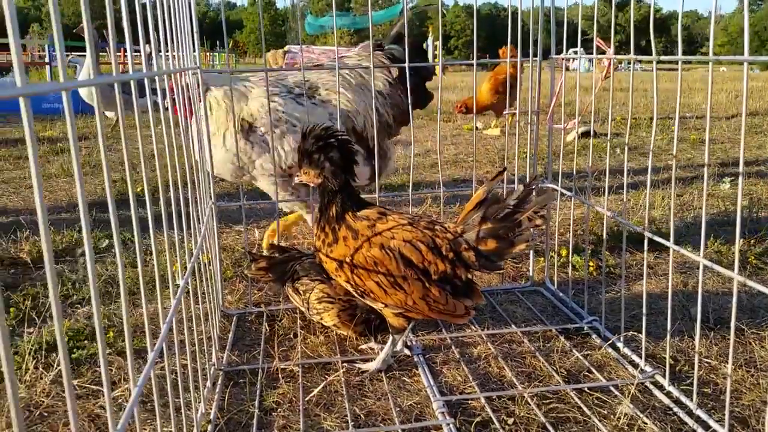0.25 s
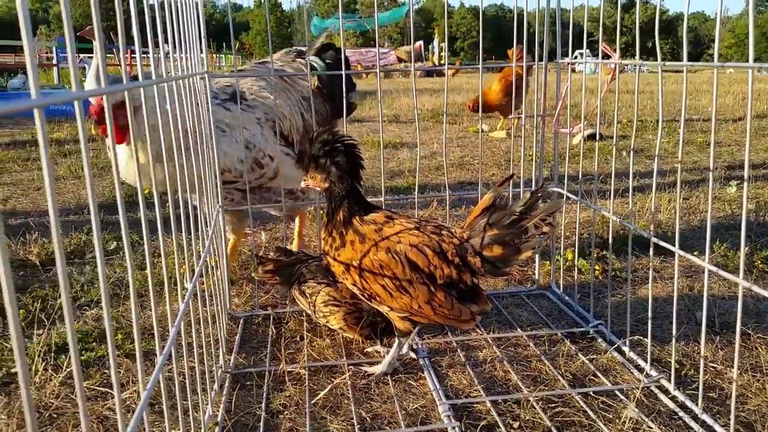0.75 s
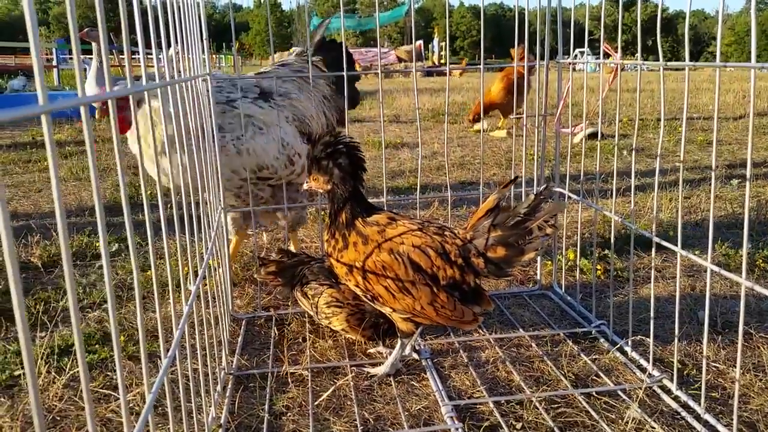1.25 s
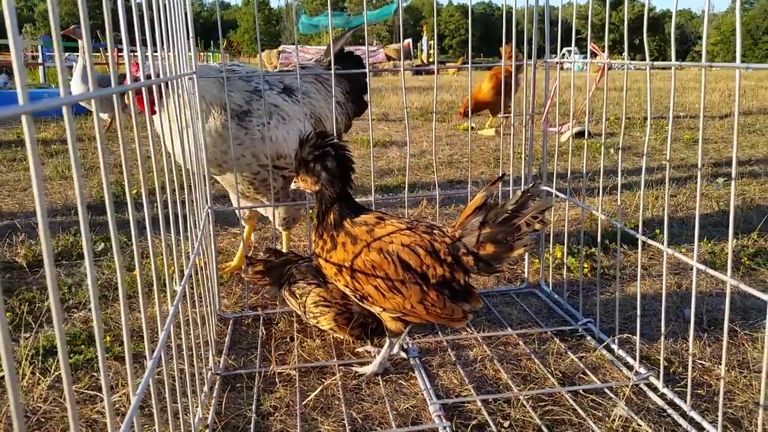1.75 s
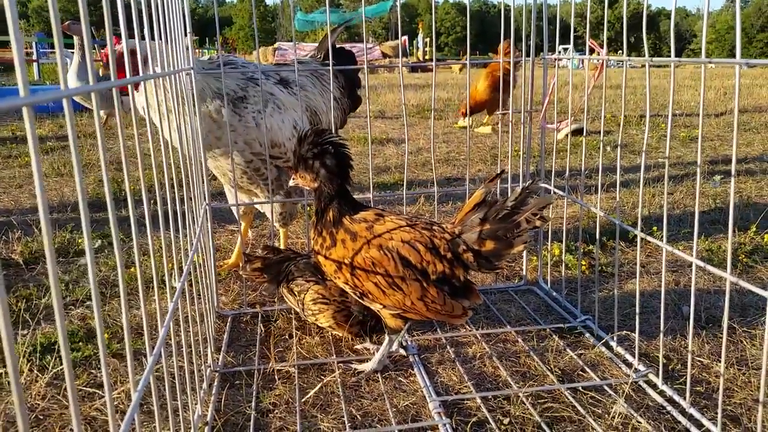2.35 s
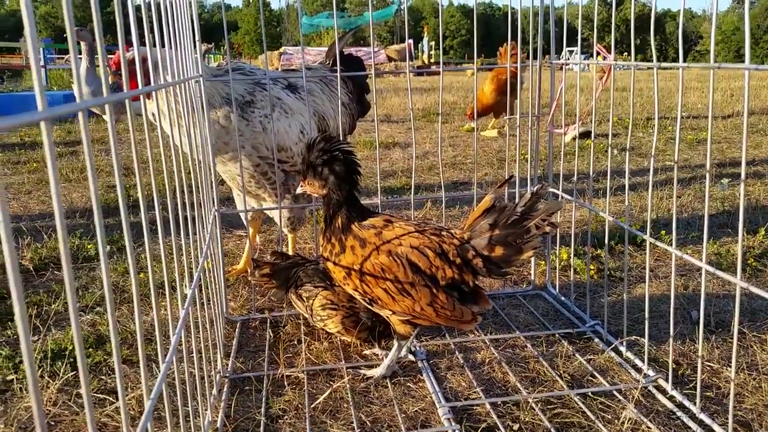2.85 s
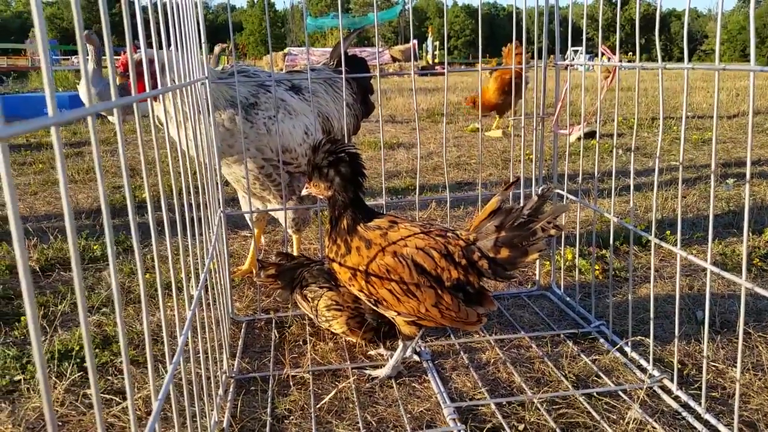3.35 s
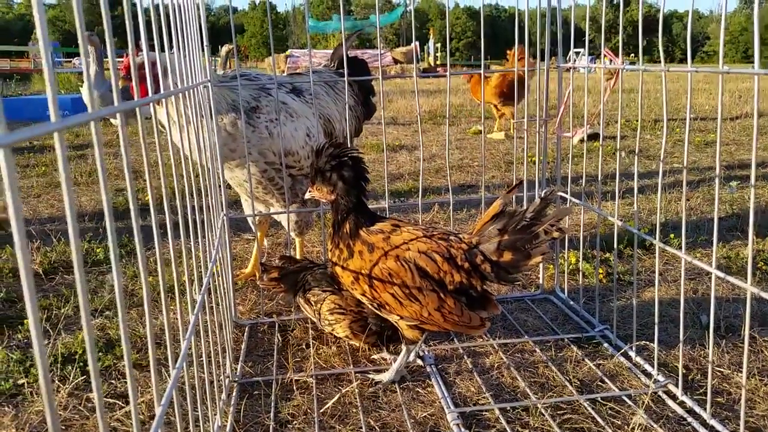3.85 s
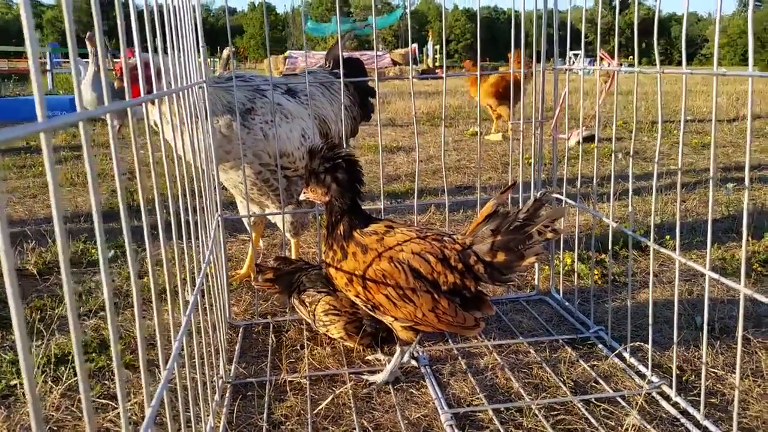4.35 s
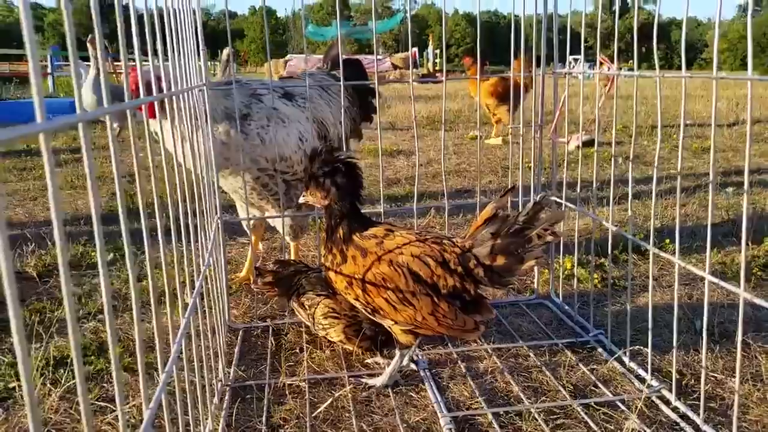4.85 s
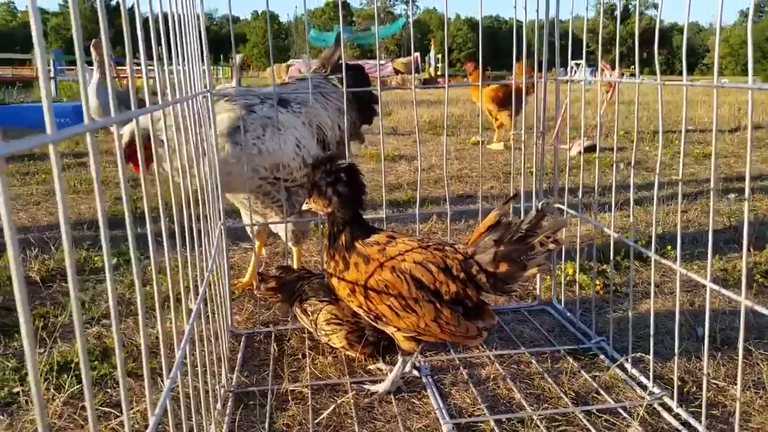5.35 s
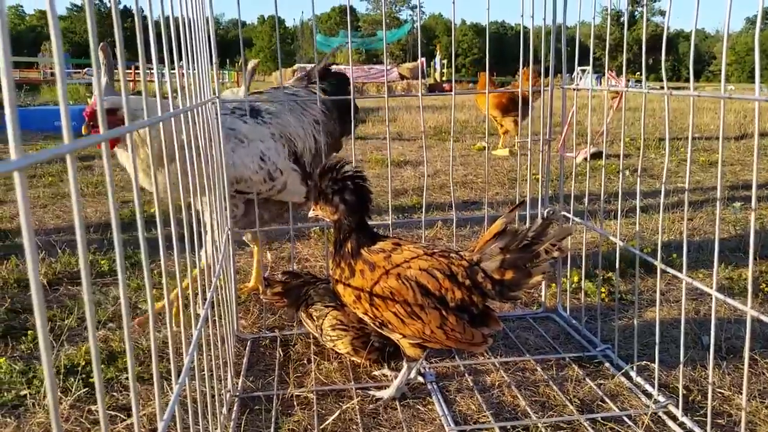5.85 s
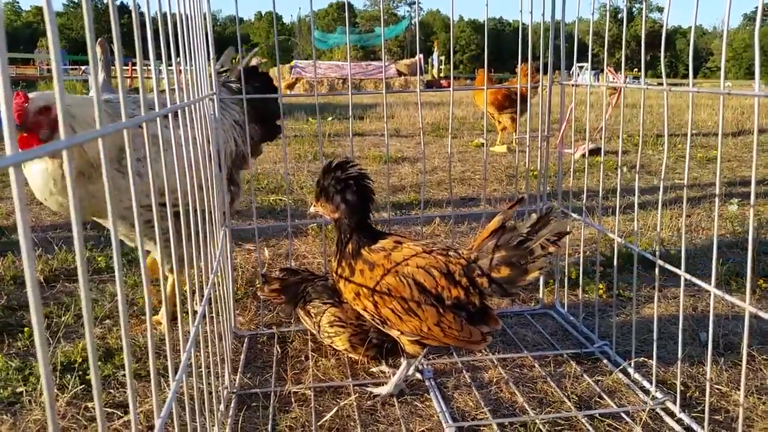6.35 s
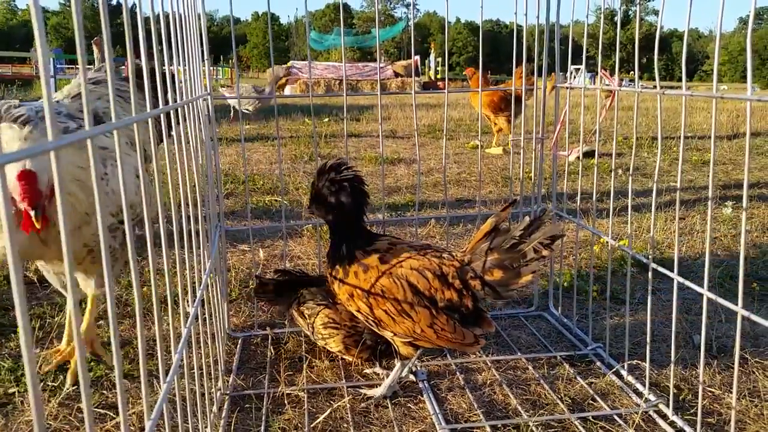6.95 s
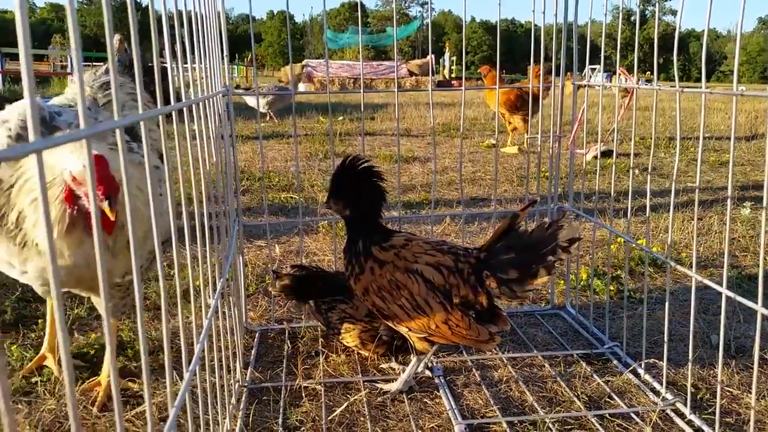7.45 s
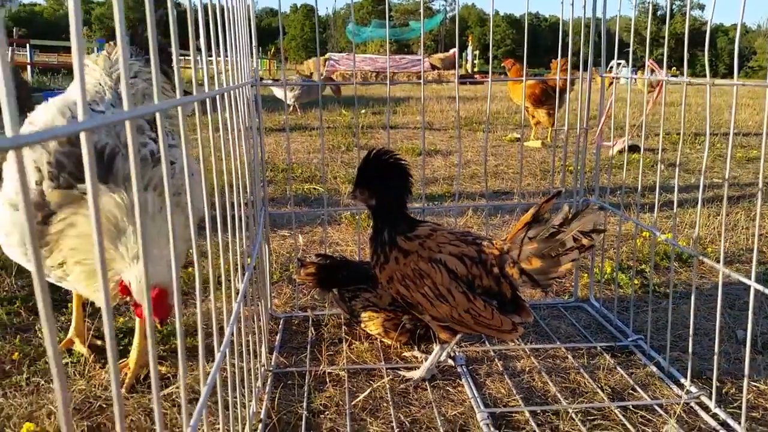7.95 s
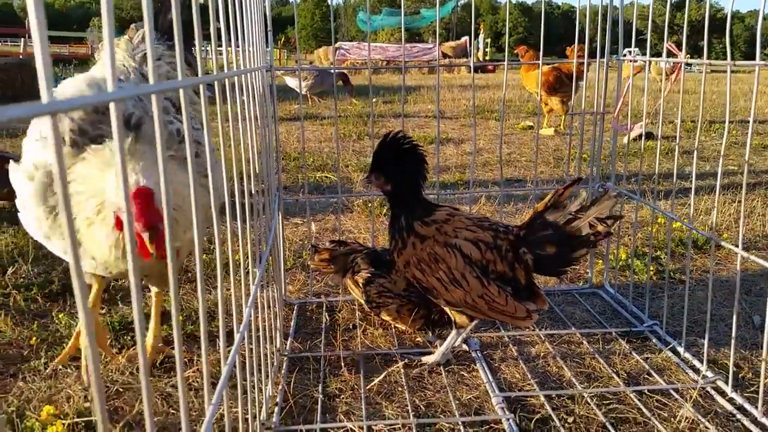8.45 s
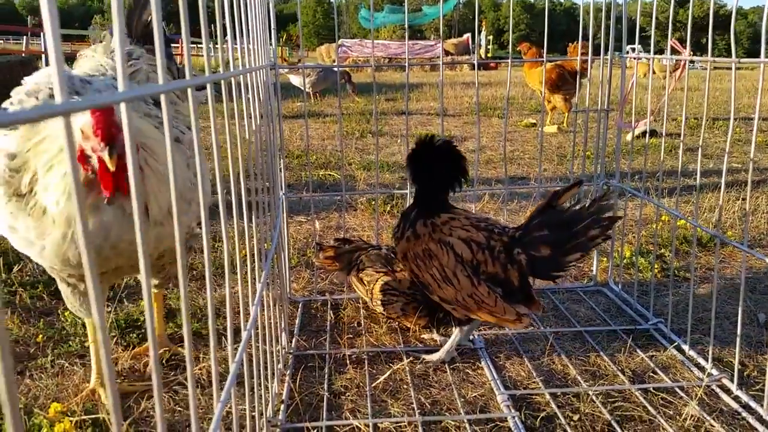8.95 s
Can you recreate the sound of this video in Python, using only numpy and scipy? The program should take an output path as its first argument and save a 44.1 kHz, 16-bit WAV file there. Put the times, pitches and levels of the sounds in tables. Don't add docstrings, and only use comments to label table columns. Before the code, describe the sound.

Calm open farmland with almost no echo: crickets trill thinly, a katydid rasps faintly and a distant aircraft hums lower and lower. Two rooster clucks come early, then soft, rapid hen clucks in bursts. After a single bump on the handheld phone, rooster clucks resume with small bird peeps, dry rustles, bursting wind pops and tiny stalk snaps, ending with a loud open cluck.

```python
import sys
import numpy as np
from scipy import signal
from scipy.io import wavfile
from scipy.ndimage import uniform_filter1d

SR = 44100
rng = np.random.default_rng(int(sys.argv[2]) if len(sys.argv) > 2 else 0)


def magnitude_from_level(level_db):
    exponent = np.asarray(level_db, float) / 20
    return 10 ** exponent


def inscribe(sig):
    pcm = np.round(np.clip(np.atleast_2d(sig).T, -1, 1) * 32767)
    wavfile.write(sys.argv[1], SR, pcm.astype(np.int16))


N = 405860


def evened(x):
    return x / np.sqrt(np.mean(x ** 2) + 1e-20)


def along(points, t):
    return np.interp(t, *np.transpose(points))


def read(points, hz):
    f, value = np.transpose(points)
    return np.interp(np.log(hz + 1), np.log(f + 1), value)


def add(mix, s, sound):
    part = mix[..., max(round(s * SR), 0):][..., :sound.shape[-1]]
    part += sound[..., :part.shape[-1]]


def sides(pan_db):
    half_db = np.multiply(pan_db, .5)
    return magnitude_from_level(np.array([half_db, -half_db]))


def throat(x, modes, lean=0):
    out = np.zeros(len(x))
    for k, (hz, width, db) in enumerate(modes):
        pole = np.exp((2j * np.pi * hz - np.pi * width) / SR)
        ring = signal.lfilter([1 - abs(pole)], [1, -pole], x * np.exp(1j * lean)).imag
        out += (-1) ** k * magnitude_from_level(db) * 2 * ring
    return out


def twice(x, modes):
    return sum(throat(throat(x, [(hz, width, 0)]), [(hz, width, db)]) for hz, width, db in modes)


def smoothed(x, size):
    return uniform_filter1d(uniform_filter1d(x, size=size, axis=-1), size=size, axis=-1)


def hiss(spectrum, same, patchy_db, size=1024, swell=lambda hz, t: 0):
    hop, hz = size // 4, np.fft.rfftfreq(size, 1 / SR)
    a, b, c, d, patches = rng.standard_normal((N // hop + 5, len(hz), 5)).T
    patches = uniform_filter1d(uniform_filter1d(patches, size=8, axis=0), size=8, axis=1)
    same = np.clip(same(hz), -1, 1)[:, None]
    left, other = a + 1j * b, c + 1j * d
    z = np.array([left, same * left + np.sqrt(1 - same ** 2) * other])
    t = np.arange(a.shape[1]) * hop / SR
    z *= magnitude_from_level(spectrum(hz)[..., None] + patchy_db * evened(patches) + swell(hz[:, None], t))
    return signal.istft(z, nperseg=size, noverlap=size - hop)[1][:, :N]


def bursts(rows, edge):
    gate = np.zeros(N)
    for s, length, db in rows:
        add(gate, s, magnitude_from_level(db) * signal.windows.tukey(round(length * SR), edge))
    return gate


def glide(length, hz_at, edge):
    u = np.linspace(0, 1, round(length * SR))
    tone = np.sqrt(2) * np.sin(2 * np.pi * np.cumsum(hz_at(u)) / SR)
    return tone * signal.windows.tukey(len(u), edge)


def yard(x):
    # frequency in Hz, t60 in seconds
    echo_t60 = [(300, 0.048), (1500, 0.07), (5000, 0.04)]
    taps = np.zeros((2, SR // 2))
    at = np.arange(200, SR // 2 - 20, 20) + rng.integers(0, 20, (2, (SR // 2 - 201) // 20))
    np.put_along_axis(taps, at, rng.choice([-1., 1.], at.shape), 1)
    hz, t, z = signal.stft(taps, SR, nperseg=256)
    tail = signal.istft(z * magnitude_from_level(-60 * t / read(echo_t60, hz)[:, None]), SR, nperseg=256)[1]
    return signal.fftconvolve(x[None], tail / np.linalg.norm(tail[0]), axes=1)[:, :N]


def wind():
    # frequency in Hz, level in dB per Hz
    rumble_colour = [(12, -44), (20, 1.5), (69, 0.5), (114, -0.5), (277, -16.5), (406, -21.5), (507, -26.5),
                     (576, -27.5), (900, -32), (1170, -57), (1980, -120)]
    # time in seconds, level in dB
    breeze = [(0, -48), (1.7, -49.5), (2.1, -50), (2.7, -48.5), (3.3, -52), (3.8, -47), (4.4, -49),
              (5.3, -48), (6.1, -51), (6.7, -46.5), (7.1, -48), (7.5, -45.5), (7.9, -49.5), (8.5, -46),
              (8.9, -49.5), (9.2, -50)]
    # middle in seconds, half length in seconds, rise in dB
    swirls = [(0.0, 0.11, 11), (0.2, 0.1, 9), (0.92, 0.075, 2), (1.696, 0.31, 6.5), (2.09, 0.16, 9),
              (2.9, .15, 5), (3.293, 0.34, 6.5), (3.9, 0.33, 5), (5.049, 0.51, 7), (6.403, 0.055, 20),
              (6.81, 0.34, 13.5), (7.61, 0.24, 5), (8.166, 0.13, 3.5), (8.494, 0.092, 15), (8.92, 0.34, 11)]
    # time in seconds, peak in dB, width in ms,
    # left minus right in dB, push +1 or pull -1
    eddies = [(2.3, -37, 2.5, 14, 1), (4.245, -28.5, 2.8, 4, 1), (6.312, -38.5, 1.34, 15, 1),
              (6.375, -32.5, 3.3, -11, 1), (6.507, -33.5, 1.26, 19, 1), (7.3142, -26.5, 1.17, 23, -1),
              (7.389, -33.5, 2.3, 24, -1), (7.514, -36, 0.61, 5, 1), (7.521, -37, 1.7, 27, -1),
              (7.793, -34, 1.23, 23, 1), (8.036, -30, 2, 21, 1), (8.4297, -24.5, 4.2, 17, 1),
              (8.444, -18.5, 0.68, 35, -1), (8.469, -37.5, 0.97, 22, 1), (9.003, -31, 2.04, 24, 1)]
    t = np.arange(N) / SR
    lee_db = -13.5 + sum(db * np.clip(1 - abs(t - s) / half, 0, 1) for s, half, db in swirls)
    lumps = evened(smoothed(rng.standard_normal((2, N)), 900))
    rumble = hiss(lambda hz: read(rumble_colour, hz) - 80 * (hz > 950), lambda hz: 0.5 + 0 * hz, 1.23, size=4096)
    out = evened(rumble) * magnitude_from_level(along(breeze, t) + 2.52 * lumps) * magnitude_from_level([0 * t, lee_db])
    for at, peak_db, width_ms, side_db, push in eddies:
        u = np.arange(-8, 8, 700 / (width_ms * SR))
        swing = -3.1 * u / (1 + u ** 2) ** 2 * np.cos(np.pi * u / 16)
        port_gains = magnitude_from_level([[min(side_db, 0)], [min(-side_db, 0)]])
        add(out, at + u[0] * width_ms / 700, np.sign(push) * magnitude_from_level(peak_db) * swing * port_gains)
    return out


def field():
    # frequency in Hz, level in dB per Hz
    distant_air = [(120, -27.5), (200, -5.5), (515, -11.5), (575, -13.5), (2460, -32), (3750, -25)]
    far_chorus = [(4050, -16.5), (4700, -12), (5150, -17.5), (6150, -44), (7210, -40.5)]
    shrill_insects = [(7900, -22), (8600, -45.5), (9500, -35), (10800, -37.5), (12800, -27), (14000, -33.5),
                      (14600, -45), (15500, -44)]
    # time in seconds, level in dB
    field_level = [(0.0, -68.5), (0.33, -69), (0.64, -69), (0.97, -69), (2.02, -71), (3.231, -73),
                   (4.201, -71), (4.79, -72.5), (5.23, -68.5), (6.07, -74.5), (7.46, -67.5), (7.66, -68),
                   (7.86, -70.5), (8.46, -71), (8.68, -69), (9.2, -70.5)]
    # frequency in Hz, left-right likeness from 0 to 1
    field_same = [(60, 0.34), (180, 0.23), (550, 0.53), (1650, 0.2), (4970, 0.1), (15000, 0.042)]
    # frequency in Hz, left minus right in dB
    field_balance = [(60, 2), (180, -8), (550, 2.5), (1650, 2.5), (4970, 8.5), (15000, 1)]
    # time in seconds, change in dB
    shrill_swell = [(0, -0.5), (2.0, 1.5), (2.4, -1.5), (5.0, -1), (5.75, 0), (5.9, 3), (6.15, -5),
                    (6.3, 1.5), (7.0, 2.5), (8.3, -1), (8.75, 3), (9.2, 0)]
    # time in seconds, change in dB
    hush = [(5.84, 0.3), (5.9, -6), (6.14, -6), (6.3, 1.3)]

    def colour(hz):
        balance = np.outer([.5, -.5], read(field_balance, hz))
        return read(distant_air + far_chorus + shrill_insects, hz) + balance

    def swell(hz, t):
        return (hz > 9000) * along(shrill_swell, t) + (abs(hz - 8000) < 700) * along(hush, t)

    chorus = hiss(colour, lambda hz: read(field_same, hz), 1.7, swell=swell)
    return evened(chorus) * magnitude_from_level(along(field_level, np.arange(N) / SR) + 6.5)


def aircraft():
    # time in seconds, engine tone in Hz, level in dB
    flight = [(0, 546, -82), (1.499, 540, -89), (2.999, 512, -75), (4.502, 486, -72), (6, 467.5, -71.5),
              (7.501, 455.3, -69), (9.2, 436.6, -70)]
    s, hz, db = np.transpose(flight)
    t = np.arange(N) / SR
    flutter = evened(smoothed(rng.standard_normal(N), 1800))
    turns = np.cumsum(np.interp(t, s, hz) + 5.0 * flutter[::-1]) / SR
    return magnitude_from_level(np.interp(t, s, db) - 1.5 + 4.9 * flutter) * np.sin(2 * np.pi * turns)


def cricket(trills, period, length, top_hz, sag_hz):
    out = np.zeros(N)
    for rows in trills:
        s, db = np.transpose(rows)
        count = np.r_[0, np.cumsum(np.round(np.diff(s) / period))]
        strokes = np.arange(count[-1] + 1)
        for at, level_db in zip(np.interp(strokes, count, s), np.interp(strokes, count, db)):
            slip, detune, uneven = rng.standard_normal(3)
            tone = glide(length, lambda u: top_hz + 25 * detune - sag_hz * (u - .5) ** 2 * (1 + 2 * u), 0.71)
            tone *= np.linspace(.5, 1.3, len(tone))
            add(out, at - length / 2 + 0.0003 * slip, magnitude_from_level(level_db + 0.4 + 0.78 * uneven) * tone)
    return out


def near_cricket():
    # time in seconds, level in dB
    near_trills = [
        [(.008, -68.5), (.513, -68.5), (1.279, -69), (1.475, -68.5)],
        [(2.158, -73), (2.394, -71.5), (2.644, -67.5), (3.022, -69.5), (4.366, -69), (5.683, -67.5),
         (5.819, -70)],
        [(5.87, -85), (6.065, -96)],
        [(6.165, -78), (6.408, -66), (6.79, -68.5), (7.316, -65.5), (8.807, -65), (9.182, -65)],
    ]
    return cricket(near_trills, period=.063, length=0.023, top_hz=8060, sag_hz=840)


def rooster():
    # start in seconds, length in seconds, level in dB, pitch in Hz, mouth ring in dB,
    # share of pitch lost at the end
    clucks = [
        (0.047, 0.013, -45, 267, -5, 0.56),
        (0.88, 0.02, -38.5, 268, -5.5, 0.32),
        (5.7656, 0.011, -52.5, 290, -24, .1),
        (5.9040, 0.0226, -40, 267, -11, 0.18),
        (6.9515, 0.014, -36, 250, -2, 0.19),
        (7.535, 0.038, -47, 311, -24, 0.18),
        (7.5588, 0.04, -36, 236, -6.5, 0.15),
        (8.7249, 0.021, -27, 269, 4.5, 0.037),
    ]
    # frequency in Hz, width in Hz, level in dB
    throat_modes = [(244, 460, 4), (788, 134, 9.5), (1052, 140, 0)]
    beak_modes = [(1804, 340, -20.5), (2680, 260, -15.5), (3250, 260, -14.5)]
    # time in seconds, left minus right in dB
    head_turn = [(0, 5), (.9, 3.5), (5.9, 5), (6.95, 3), (7.6, 1), (8.73, 9)]
    overshoot, settle = 0.31, 0.097
    tiring, lean = 1.4, 1.45
    out = np.zeros((2, N))
    for s, length, db, hz, mouth_db, sag in clucks:
        u = np.arange(round((length + .03) * SR)) / (length * SR)
        pitch = hz * (1 + overshoot * np.exp(-u / settle) - sag * np.minimum(u, 1) ** 3)
        turns = np.cumsum(pitch) / SR
        sharp = np.clip(40 * magnitude_from_level(2 * (mouth_db + 15.0)), 1.5, 40)
        puffs = np.exp(sharp * (np.cos(2 * np.pi * (turns - .3)) - 1))
        effort = np.clip(u / (11.6 * length), .3, 1) * np.clip((1 - u) * length / 0.0006, 0, 1)
        flow = (puffs.mean() - puffs) * effort * abs(1 - tiring * sag * u)
        stretch = [hz / 260, hz / 260, 1]
        mouth = [0, max(mouth_db, -12), 0]
        modes = [(f * k, w, g + m) for (f, w, g), k, m in zip(throat_modes, stretch, mouth)]
        long_s, clipped_s = max(length - .024, 0), max(.018 - length, 0)
        snap_db = -600 * long_s - 2500 * clipped_s
        dull = signal.butter(6, 1290 - 9000 * long_s, fs=SR, output="sos")
        voice = signal.sosfilt(dull, throat(flow, modes, lean=lean)) + magnitude_from_level(snap_db) * twice(flow, beak_modes)
        beam = throat(voice, [(1100, 280, 0)], lean=np.pi / 2)
        voice = voice + (sides([along(head_turn, s)]) - 1) * beam
        add(out, s, magnitude_from_level(db) * voice / np.sqrt(np.mean(voice[:, u < 1] ** 2)))
    return out


def far_cricket():
    # time in seconds, level in dB
    far_trills = [
        [(.094, -89), (.293, -74), (.492, -79), (1.237, -74), (1.508, -70), (1.712, -73), (1.978, -78.5),
         (2.253, -75)],
        [(2.608, -72), (2.75, -71), (2.863, -75)],
        [(7.956, -67), (8.226, -76), (8.829, -66), (9.098, -68)],
    ]
    return cricket(far_trills, period=.0675, length=0.01356, top_hz=8170, sag_hz=404)


def katydid():
    # start in seconds, length in seconds, level in dB
    rasps = [(.16, 0.15, -81), (.94, 0.12, -84), (1.42, 0.18, -84), (2.03, .14, -81.5), (2.51, 0.14, -84.5),
             (2.98, 0.15, -87), (3.43, 0.13, -84), (4.04, 0.14, -85), (4.72, 0.15, -84),
             (5.11, 0.14, -79.5), (5.69, 0.17, -81.5), (6.165, 0.16, -82), (6.72, 0.14, -79.5),
             (7.24, 0.19, -80), (8.1, .13, -82), (8.76, 0.14, -80.5)]
    clicks = rng.standard_normal(N) * (rng.random(N) < 2500 / SR)
    wing = [(9800, 1500, 0)]
    return evened(twice(twice(clicks, wing), wing)) * bursts(rasps, .4)


def hen():
    # start in seconds, level in dB, high voice in Hz, share of the high voice from 0 to 1
    soft_clucks = [(1.41, -63, 670, 0.6), (1.493, -66, 694, 0.52), (1.589, -61, 719, 0.42),
                   (1.689, -61.5, 732, 0.32), (1.788, -57.5, 695, 0.4), (1.893, -52.5, 663, 0.48),
                   (2.033, -63.5, 720, 0.55), (3.125, -64, 648, 0.46), (3.21, -62.5, 666, 0.31),
                   (3.314, -60.5, 642, 0.5), (3.422, -59, 689, 0.49), (3.527, -61.5, 723, 0.66),
                   (4.71, -59, 676, 0.51), (4.787, -55.5, 698, 0.27), (4.893, -58.5, 686, 0.5),
                   (4.999, -53, 708.5, 0.47), (5.103, -55.5, 643, 0.46), (5.201, -49.5, 665, 0.43),
                   (5.321, -61.5, 737, 0.74), (6.62, -75.5, 593, 0.39), (6.75, -70, 627, 0.32),
                   (6.855, -67.5, 582, 0.2), (6.907, -54.5, 676, 0.42), (7.006, -67, 800, 0.59),
                   (7.103, -61, 695, 0.31), (7.203, -53.5, 741, 0.2), (7.307, -51.5, 700, 0.16),
                   (7.434, -57.5, 800, 0.45)]
    # from this time in seconds, cluck length in seconds, low voice in Hz,
    # its rise as a share, beak turned to the phone in dB, high voice early by seconds
    runs = [(1.3, 0.029, 531, -0.023, 6, 0.00087), (1.85, 0.024, 525, -0.024, 4, 0.0012),
            (2.0, 0.035, 540, -0.01, 4, 0.011), (3.0, .03, 519, -0.026, 1, 0.00083),
            (3.5, 0.046, 520, -0.018, 4, 0.0088), (4.6, .028, 515, -.02, -1, 0.00093),
            (4.95, 0.034, 510, 0.027, 0, .016), (5.05, 0.024, 510, -0.018, -4, .002),
            (5.15, 0.035, 500.5, 0.13, -1, 0.0018), (5.28, 0.0376, 495, 0.024, 4, 0.0063),
            (6.5, 0.065, 555, 0.022, 0, .001), (6.81, 0.037, 493.4, 0.078, 5, 0.0015),
            (6.97, 0.024, 560, -0.049, -1, 0.00088), (7.28, 0.03, 555, -0.026, 5.5, 0.00089),
            (7.38, 0.035, 547, -0.028, 7, .028)]
    # frequency in Hz, width in Hz, level in dB
    hen_throat = [(520, 267, -5), (800, 173, -1.5), (1090, 410, 1), (1500, 160, 3), (2040, 210, -2.5)]
    beak_side_on = [(2050, 210, -5), (3040, 180, 1), (3450, 220, -4), (4330, 360, -6)]
    beak_facing = [(2300, 200, -5), (3150, 200, -3), (3650, 260, -1), (4300, 240, 3), (5400, 300, -3)]
    turns_at, lead = 6.8, .06
    out = np.zeros(N)
    for (s, db, high_hz, share), start in zip(soft_clucks, rng.random((len(soft_clucks), 2))):
        length, low_hz, rise, beak_db, early_s = [run[1:] for run in runs if run[0] < s][-1]
        share = np.clip(share, 0, 1)
        t = np.arange(round((lead + length + 0.014) * SR)) / SR - lead
        high_length = (1.1 - 0.53 * share) * length + .022 * share + 0.32 * early_s
        early = np.clip((t + early_s + 0.0227 * share) / high_length, 0, 1)
        late = np.clip((t + 0.0024) / (length + 0.0072), 0, 1)
        wobble = 1 + 0.15 * uniform_filter1d(rng.standard_normal((2, len(t))), size=120, axis=1)
        arch = 1 + 0.05 * np.sin(np.pi * late) - .04 + rise * (late - .5)
        low = np.cumsum(low_hz * wobble[0] * arch) / SR + start[0]
        climb = np.clip(early_s / .006, 0, 1)
        slide = climb * (.03 - .3 * (.9 - np.minimum(early, .9)) ** 1.334)
        slide -= (1 - climb) * (.07 + .17 * (early - .45))
        high = np.cumsum(high_hz * wobble[1] * (1 + slide)) / SR + start[1]
        opening = (1 - share) * np.sin(np.pi * late ** 0.68) ** 1.25 * np.cos(2 * np.pi * low)
        opening += share * np.sin(np.pi * early) ** .6 * np.cos(2 * np.pi * high)
        flow = np.exp(2.0 * opening) - 1
        flow *= 1 + .16 * rng.standard_normal(len(t))
        flow -= uniform_filter1d(flow, size=100)
        beak = twice(flow, beak_side_on if s < turns_at else beak_facing)
        voice = throat(flow, hen_throat) + magnitude_from_level(beak_db + 0.21 * (db + 63.5)) * beak
        sounding = voice[(t > -early_s) & (t < length)]
        add(out, s - lead, magnitude_from_level(db) * voice / np.sqrt(np.mean(sounding ** 2)))
    return out


def rustles():
    # start in seconds, length in seconds, level in dB
    sweeps = [
        (1.62, 0.21, -75.5),
        (1.75, 0.21, -80.5),
        (4.98, 0.082, -74),
        (5.18, 0.23, -80),
        (5.84, 0.47, -80.5),
        (6.78, 0.29, -71),
        (7.12, 0.14, -72),
        (8.67, 0.14, -70),
        (9.07, 0.11, -71),
    ]
    # frequency in Hz, level in dB
    rustle_colour = [(1500, -10), (3500, -25), (6500, -4), (10000, -11.5), (13000, -0.5), (15500, -6.5)]
    crackle = hiss(lambda hz: read(rustle_colour, hz), lambda hz: .5 + 0 * hz, 2.5, size=256)
    return evened(crackle) * bursts(sweeps, .7)


def knock():
    # time in seconds, peak in dB, width in ms, left minus right in dB
    bump = (4.2253, -13.5, 1, 17)
    # frequency in Hz, width in Hz, level in dB
    case_modes = [(67.5, 92, -4), (250, 5.7, -4.5), (507, 95, -12.5), (860, 76, -21), (1000, 47, -17),
                  (1620, 54, -15), (386, 180, -14)]
    s, peak_db, width_ms, side_db = bump
    t = np.arange(-.003, .5, 1 / SR)
    blow = np.exp(-.5 * (1000 * t / width_ms) ** 2)
    ring = throat(blow ** 14, case_modes)
    out = np.zeros((2, N))
    add(out, s - .003, magnitude_from_level(peak_db) * (blow - 0.84 * ring / abs(ring).max()) * magnitude_from_level([[0], [-side_db]]))
    return out


def ticks():
    # time in seconds, peak in dB
    snaps = [
        (5.921, -64),
        (8.745, -54),
        (8.872, -60),
        (9.12, -52),
    ]
    out, t = np.zeros(N), np.arange(200) / SR
    for (s, db), grit in zip(snaps, rng.standard_normal((len(snaps), 201))):
        add(out, s, magnitude_from_level(db) * np.diff(grit) * np.exp(-t / 0.001) / 3)
    return out


def peeps():
    # start in seconds, length in seconds, level in dB, first Hz, last Hz
    whistles = [
        (6.12, .025, -81, 8700, 8570),
        (6.409, 0.059, -72.5, 8400, 7240),
        (6.631, 0.042, -69.5, 8240, 7460),
        (6.808, .03, -75, 8050, 7230),
    ]
    out = np.zeros(N)
    for s, length, db, hz0, hz1 in whistles:
        add(out, s, magnitude_from_level(db) * glide(length, lambda u: hz0 + (hz1 - hz0) * u, 0.41))
    return out


def scene():
    cock, hens = rooster(), hen()
    birds = (cock + hens) * sides([.8]) + yard(magnitude_from_level(-20) * cock.mean(0) + magnitude_from_level(-5.0) * hens)
    near = near_cricket() + peeps()
    far = far_cricket()
    insects = near * sides([5.0]) + far * sides([6.0]) + katydid() * sides([7.0])
    insects = insects + magnitude_from_level(-12) * yard(near + far)
    return birds + insects + rustles() + field() + aircraft() + wind() + knock() + ticks()


def band_limit(x):
    return signal.sosfilt(signal.butter(12, 15720, fs=SR, output="sos"), x)


def record(dry):
    cut = signal.sosfilt(signal.butter(2, 30, "high", fs=SR, output="sos"), dry)
    return band_limit(cut - .0004)


dry = scene()
out = record(dry)
inscribe(out)
```